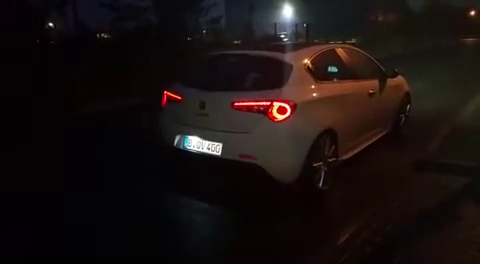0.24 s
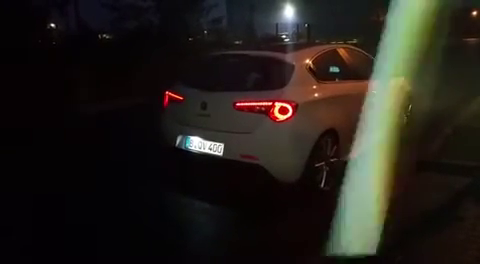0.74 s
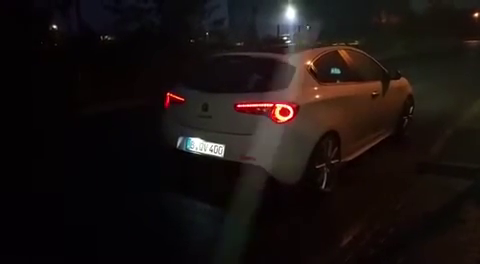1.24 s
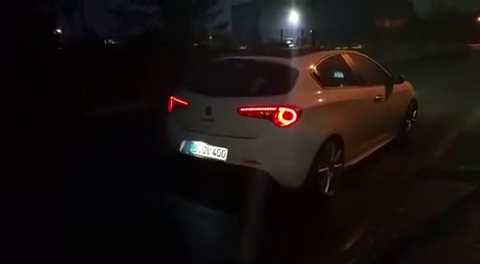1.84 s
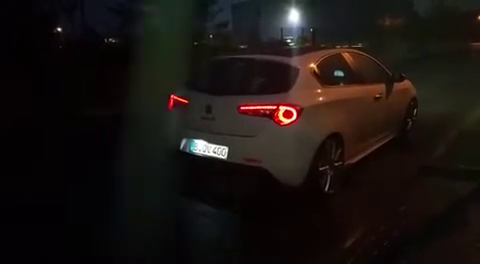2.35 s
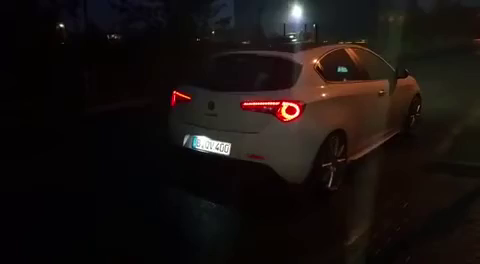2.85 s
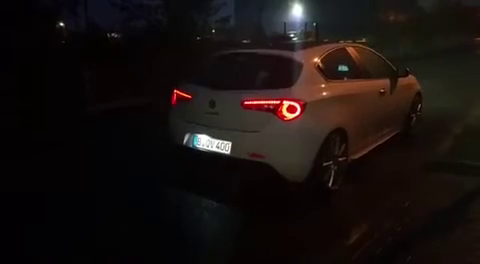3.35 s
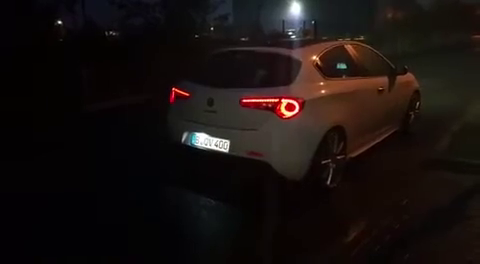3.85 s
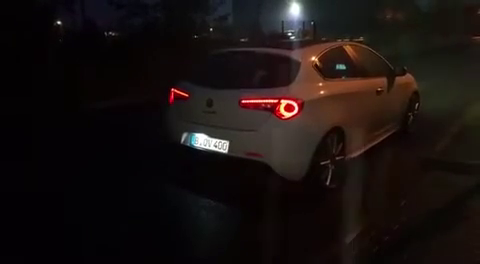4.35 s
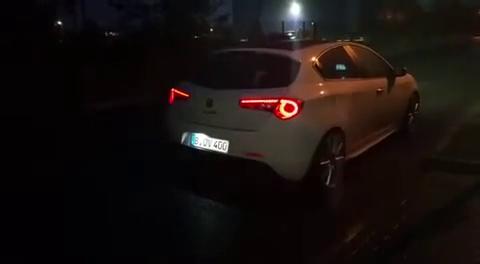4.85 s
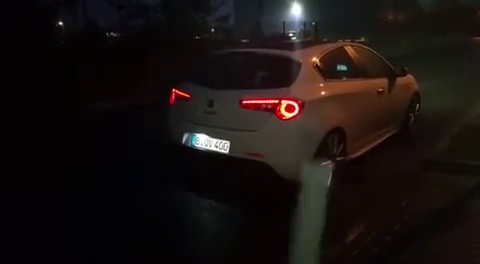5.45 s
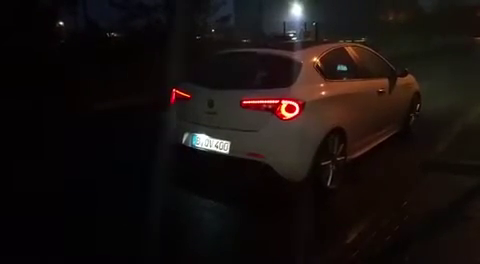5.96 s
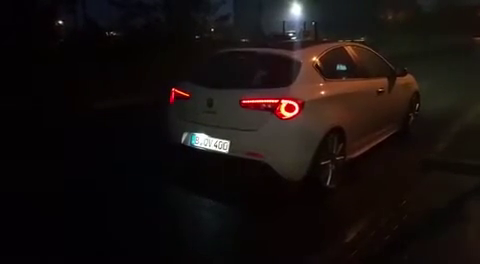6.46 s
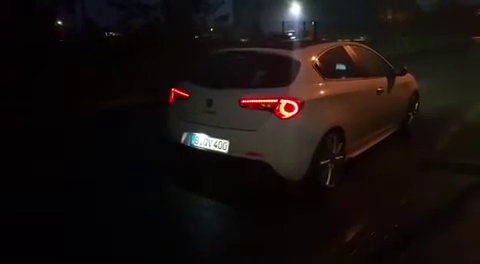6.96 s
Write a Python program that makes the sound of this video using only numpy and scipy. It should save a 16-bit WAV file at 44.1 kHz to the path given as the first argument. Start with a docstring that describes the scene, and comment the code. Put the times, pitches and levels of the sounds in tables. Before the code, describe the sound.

A turbocharged four-cylinder car stands on a street, heard from behind. At the start a rev is dying away with a low burble and small pops, reaching idle at about 1.5 seconds. At 1.8 seconds the engine revs up with a booming, rasping bark, peaking near 2.5 seconds. Sharp exhaust bangs and a brief hiss of air follow at 2.6, then crackles and smaller pops until about 3.6. The engine burbles down with soft low thumps and settles to idle around 5 seconds. A second rev rises at 5.6 seconds, holds briefly, and a third climbs higher from 6.3. The loudest bang comes at about 6.8 seconds, followed by a light blip of the throttle near 7. Faint engine clatter, ticking and turbo hiss run underneath, with a very faint falling whistle as the engine slows. Buildings give the bangs a short echo.

```python
"""Revving a turbo car

A turbocharged four-cylinder car stands on a wet street and is revved three times, heard from behind.
Each firing sends a pulse down the exhaust, which booms and rasps, louder at the pipe's own pitches.
As the revs fall, unburnt fuel burbles, pops and bangs, until the idle control feeds the engine again.
The fuel pump ticks, the turbo hisses and whistles as it runs down, and buildings echo the bangs."""
import sys
import numpy as np
from scipy import signal
from scipy.fft import rfft, irfft, next_fast_len
from scipy.io import wavfile
from scipy.ndimage import uniform_filter1d, map_coordinates

SR = 44100
rng = np.random.default_rng(int(sys.argv[2]) if len(sys.argv) > 2 else 0)


def to_wav(sig):
    """Store sig (one row per channel, or 1-D mono) as 16-bit WAV at the path in sys.argv[1].

    Samples outside -1..1 are clipped; the rate is SR.
    """
    pcm = np.clip(np.atleast_2d(sig), -1, 1) * 32767
    pcm = np.round(pcm).astype(np.int16)
    wavfile.write(sys.argv[1], SR, pcm.T)  # frames by channels


N = 317961

# how alike the noise is in both ears: (frequency [Hz], likeness [0-1])
EAR_LIKENESS = [(400,1),(800,0.99),(1400,0.12),(3000,0.22),(7000,0.23),(15000,0.1)]
# how much louder the left microphone is than the right: (frequency [Hz], gain [dB])
LEFT_LEAN = [(1000,0),(2010,1.5),(3330,3.5),(5500,-6.5),(9080,12),(12000,-7),(15000,-8)]
# how long the street echoes: (frequency [Hz], time to fade by 60 dB [s])
ECHO_FADE = [(150,0.32),(600,0.54),(3000,0.4),(8000,0.57),(15000,0.2)]
# the tone of each sound, as the pitches it favours: (frequency [Hz], relative gain [dB])
ECHO_TONE = [(150, -45.5), (500, -34.5), (1200, 3.5), (12000, 13.0)]  # echo off the buildings
CLATTER_TONE = [(100, 4.5), (260, 13.5), (370, 8), (540, 4.5), (680, 13.5), (800, 1), (1000, 6), (1450, -5),
                (1700, -1), (2000, 0), (2600, -7.5), (3100, -16.5), (3900, -12.5), (4800, -24),
                (7000, -28.5), (16000, -22)]  # moving engine parts
HISS_TONE = [(3000,-48),(7000,-22),(10000,-5.5),(12300,2),(13800,-1.5),(15500,6)]  # rushing air
TICK_TONE = [(2000,-24),(9000,-28.5),(12300,0),(13500,-4),(15500,6.5)]  # fuel pump
SILENCER_TONE = [(20,-46.5),(35,-1.5),(60,-2.5),(90,-1),(140,-4.5),(180,-10),(236,-11),(330,-22),(800,-102)]  # flutter in the silencer
HUM_TONE = [(250, -53.5), (385, -18), (425, 31.5), (470, -12), (800, -62.5)]  # one narrow resonance of the pipe
KNOCK_TONE = [(120,-35.5),(240,-16),(330,-0.5),(440,12),(550,-8.5),(650,9),(800,-31.5),(1130,-1.5),(1450,-32),(3000,-84)]  # hollow knock of the pipe
BANG_TONE = [(100,13.5),(240,-3.5),(350,7.5),(450,0),(560,-1.5),(660,5.5),(800,-1),(930,-2),(1150,5.5),(1450,-11.5),(1800,4),(2100,-29.5),(2350,-9),(3100,-18.5),(4100,-28.5),(9000,-59)]  # body of an explosion
CRACK_TONE = [(800, -122), (2000, 12), (3200, 3.5), (4200, 6), (6000, 4), (10000, -5), (13000, 1.5),
              (15500, -1)]  # its sharp edge
BARK_TONE = [(120,-39.5),(250,-2.5),(340,-10),(415,11.5),(450,10),(490,2),(560,-4.5),(640,2),(700,-7.5),(760,-4),(930,-15.5),(1150,-13.5),(1430,-46),(1700,-13.5),(2100,-67),(2500,-24.5),(3500,-57.5)]  # exhaust pipe, struck by the firings
RASP_TONE = [(900,-1),(1150,24),(1430,-6.5),(1720,19),(2100,7.5),(2550,9),(3200,-3),(4200,2.5),(5500,1),(7000,-5),(8000,-4),(10500,-19),(16000,-43)]  # swirling exhaust gas

# loudness of the engine's clatter: (time [s], level [dB])
CLATTER_LEVEL = [(0, -32.5), (.25, -43.5), (.75, -56), (1.22, -41.5), (2.75, -33.5), (2.9, -42.5),
                 (4.0, -47.5), (4.59, -39), (5.49, -44), (5.6, -37), (7.21, -40)]
# the turbo running down: (time [s], pitch [Hz], level [dB])
TURBO_WHISTLE = [(1.0,6160,-89),(1.17,6070,-70),(1.4,5900,-66),(1.7,5850,-93),(4.4,6200,-88),(4.57,6048,-64),(4.85,5860,-66),(5.2,5660,-85)]
# the dump valve lets the turbo's pressure go: (time [s], level [dB])
VALVE_DUMPS = [(2.635, -30), (6.85, -44)]
# single sharp, high ticks: (time [s], level [dB])
SNAPS = [(1.822, -32), (3.093, -22), (3.367, -36), (5.554, -26)]
# soft heaves of gas with no crack: (time [s], peak level [dB])
SOFT_HEAVES = [(0.49, -17.5), (0.883, -16.5), (0.991, -16.5), (2.412, -6), (2.555, -0.5), (3.664, -13),
               (3.82, -13.5), (3.899, -18.5), (4.136, -9), (4.257, -14), (4.375, -11.5), (4.409, -12),
               (4.769, -14), (5.545, -8), (6.148, -7), (6.185, -4.5), (6.636, -5)]
# fuel exploding in the pipe, in relative levels: (time [s], blast [dB], heave [dB], crack [dB])
EXPLOSIONS = [(0.073, -29, -15, -39.5), (0.165, -31, -15, -63), (0.205, -27.5, -35, -53),
              (0.266, -34.5, -16.5, -54), (0.302, -38, -18, -57), (0.343, -32.5, -16, -58),
              (2.588, -8.5, -6, -33), (2.626, -2, -14, -18), (2.667, -18, -14.5, -26.5),
              (2.744, -22.5, -15.5, -45), (2.858, -31, -15.5, -50), (2.98, -14, -16, -39.5),
              (3.034, -37, -35, -46.5), (3.093, -13, -13, -36), (3.123, -37, -24, -41.5),
              (3.21, -22.5, -18, -39), (3.261, -25.5, -34, -46), (3.368, -25.5, -15, -41),
              (3.398, -26.5, -20, -43), (3.476, -22, -11.5, -51), (3.508, -29.5, -12, -46),
              (3.57, -25.5, -21, -53), (3.597, -30.5, -14.5, -56), (4.191, -38, -35, -65),
              (6.841, 7.5, -2, -14), (6.876, -14, -22, -38.5)]

# engine speed: (time [s], firing rate [Hz])
ENGINE_SPEED = [(0, 90.5), (.3, 84), (.94, 59), (1.51, 47), (1.76, 44.2), (1.85, 47.3), (2.09, 82),
                (2.38, 132), (2.55, 139.5), (2.85, 114.4), (3.35, 95), (3.57, 83), (4.16, 63.2),
                (4.82, 48.6), (5.56, 38.2), (5.68, 49.2), (5.88, 78.5), (6.0, 85), (6.3, 83.4),
                (6.615, 134.5), (6.83, 135.5), (7.0, 131), (7.12, 136), (7.21, 125)]
# spells when the engine gets fuel, in relative levels; between them it coasts. In order: a dying rev,
# idle, rev one, late firing, sputter, idle, rev two, rev three, late firing, a light touch of the pedal.
# (start [s], end [s], rise [s], fall [s], load [dB], bark [dB], bark swell [dB/s],
# tilt [dB per harmonic], rasp [dB], air hiss [dB], uneven burning [0-1])
FUEL_SPELLS = [(0, 0.156, 0.0058, 0.27, -16.5, -12.5, -22, -7.5, -23, -67, 0.57),
               (0.983, 1.788, 0.29, 0.015, -13.5, -17, -49, 2, -26, -45.5, 0.2),
               (1.777, 2.394, 0.076, 0.06, -0.3, 0, -2.5, 0.07, 1, -39.5, 0.18),
               (2.419, 2.549, 0.01, 0.014, -4.5, -10, -2, 2, -6, -37, 0.54),
               (3.08, 4.265, .1, 0.11, -26, -18, 17, -4.5, -37, -69, 0.77),
               (4.208, 5.595, 0.3, 0.01, -12.5, -18, -26, 0.25, -23.5, -44.5, 0.14),
               (5.57, 5.984, 0.079, 0.29, -1, -0.5, 25, 0.45, 1.5, -37.5, 0.18),
               (6.269, 6.626, .07, 0.044, -0.6, -0.5, -12, -2.2, -.5, -38, 0.17),
               (6.66, 6.811, 0.01, 0.024, -5.5, -10, 4, 0, -7.5, -35.5, 0.44),
               (6.95, 7.113, 0.038, 0.0082, -11.5, -12, -8, 2, -14, -58, 0.19)]
# the four cylinders in turn: (relative strength [dB])
CYLINDER_DB = [-0.79,-2.4,1,1]
# the pipe barks most at speeds that hit its resonances: (firing rate [Hz], gain [dB])
BARK_BY_SPEED = [(37, -62), (43, -58), (50, -26), (68, -31.5), (80, -19), (92, -22.5), (105, -22),
                 (115, -19), (135, -15)]
# the harmonics, tones at one to five times the firing rate: (relative level [dB])
HARMONIC_DB = [2.5, -2.5, -7, -10.5, -19.5]
# how well the exhaust lets those tones through: (frequency [Hz], gain [dB])
BOOM_TONE = [(35, -17.5), (50, -8), (62, -7), (105, -8.5), (124, -14), (135, -11.5), (158, -7),
             (182, -16.5), (205, -17), (250, -11), (272, -23.5), (315, -14.5), (355, -29), (400, -17.5),
             (470, -5), (520, -17), (620, -28), (760, -45)]

COAST_LOAD_DB, COAST_BARK_DB, COAST_RASP_DB, COAST_HISS_DB = -24.5, -43, -73, -76  # left with no fuel
COAST_UNEVEN, COAST_TILT_DB = 0.79, -4  # with no fuel the engine is rougher and duller


def amp(db):
    """Turn decibels into a gain to multiply by."""
    return 10 ** (np.asarray(db) / 20)


def unit(x):
    """Scale a sound so that its average (rms) level is 1."""
    return x / np.sqrt(np.mean(x ** 2) + 1e-20)


def steady(x, size=3500):
    """Even out a sound so that its level stays near 1."""
    power = uniform_filter1d(uniform_filter1d(x * x, size), size)
    return x / np.sqrt(np.abs(power) + 1e-4 * np.mean(x * x))


def look_up(table, hz):
    """Read between the rows of a (frequency, value) table, with octaves evenly spaced."""
    table_hz, values = np.transpose(table)
    return np.interp(np.log(hz + 1), np.log(table_hz + 1), values)


def curves(table):
    """Join a timed table's rows with straight lines: one curve per column after the time."""
    times, *columns = np.transpose(table)
    return [np.interp(np.arange(N) / SR, times, column) for column in columns]


def wobble(rate):
    """A smooth curve through `rate` random values a second."""
    points = rng.standard_normal(int(N * rate / SR) + 4)
    return map_coordinates(points, [np.arange(N) * rate / SR])


def filtered(x, response):
    """Multiply each frequency in a sound by response(hz)."""
    size = next_fast_len(N + SR // 2)
    return irfft(rfft(x, size) * response(np.fft.rfftfreq(size, 1 / SR)), size)[..., :N]


def ring(x, tone, size=8192):
    """Let a sound ring through something with the given tone."""
    cepstrum = irfft(np.log(amp(look_up(tone, np.fft.rfftfreq(size, 1 / SR)))))
    # fold it so that the ringing comes after each hit, never before
    cepstrum[1:size // 2] *= 2
    cepstrum[size // 2 + 1:] = 0
    ringing = irfft(np.exp(rfft(cepstrum)))
    return filtered(x, lambda hz: rfft(ringing / np.linalg.norm(ringing), next_fast_len(N + SR // 2)))


def noise():
    """White stereo noise, alike in both ears in the bass and less so in the treble."""
    def shares(hz):
        angle = np.arccos(np.clip(look_up(EAR_LIKENESS, hz), 0, 1)) / 2
        return np.array([np.cos(angle), np.sin(angle)])
    mid, side = filtered(rng.standard_normal((2, N)), shares)
    return np.array([mid + side, mid - side])


def pulses(positions, sizes):
    """Clicks that can fall between two samples."""
    index = np.floor(positions).astype(int)[:, None] + np.arange(-7, 9)
    lag = index - positions[:, None]
    shape = np.sinc(lag) * np.cos(np.pi * lag / 16) ** 2
    return np.bincount(np.clip(index, 0, N).ravel(), (shape * sizes[:, None]).ravel(), N + 1)[:N]


def gate(cycles, sharpness, base):
    """A gain that jumps up at the start of each cycle, then sinks towards a base level."""
    return unit(base + np.exp(-sharpness * (cycles % 1)))


def bursts(rows, fade_s):
    """A gain that jumps up at each (time, level) row and drops 60 dB in fade_s."""
    t = np.arange(N) / SR
    return sum((t > start) * amp(db - 60 * np.abs(t - start) / fade_s) for start, db in rows)


def street_echo(x):
    """Buildings send back a blurred echo, thin in the bass and different at each ear."""
    hz, t, spectrum = signal.stft(rng.standard_normal((2, SR)), SR, nperseg=256)
    fade = amp(-60 * t / look_up(ECHO_FADE, hz)[:, None])
    tail = signal.istft(spectrum * fade, SR, nperseg=256)[1]
    delayed = np.pad(x, ((0, 0), (400, 0)))
    echo = signal.fftconvolve(delayed, tail / np.linalg.norm(tail[0]), axes=1)[:, :N]
    return filtered(echo, lambda hz: amp(look_up(ECHO_TONE, hz)))


def clatter(firings):
    """The engine's moving parts rattle, pulsing slightly with each firing."""
    rattle = noise() * gate(firings, sharpness=1.0, base=5.8)
    return amp(curves(CLATTER_LEVEL)[0]) * unit(ring(rattle, CLATTER_TONE))


def airflow(demand, lag_s=0.084):
    """How hard the air rushes: the turbo lags behind the pedal, and the dump valve adds gushes."""
    keep = np.exp(-1 / (lag_s * SR))
    flow = signal.lfilter([1 - keep], [1, -keep], demand)
    return np.hypot(flow + bursts(VALVE_DUMPS, fade_s=0.35), amp(COAST_HISS_DB))


def air_hiss(air):
    """Air hisses as it rushes through the turbo."""
    return air * unit(ring(noise(), HISS_TONE))


def fuel_pump(firings, air):
    """The pump ticks once per engine turn (two firings), louder when more air flows."""
    strokes = noise() * gate(firings / 2, sharpness=8, base=0.01) * amp(3.5 * wobble(25))
    return amp(-23.5) * np.sqrt(air) * unit(ring(strokes, TICK_TONE))


def turbo_whistle():
    """The slowing turbo gives a falling whistle; a fast wobble in pitch makes it airy."""
    hz, db = curves(TURBO_WHISTLE)
    return amp(db) * np.sin(2 * np.pi * np.cumsum(hz + 215 * wobble(1000)) / SR)


def snaps():
    """Single sharp ticks, as bright as the fuel pump's."""
    return ring(bursts(SNAPS, fade_s=0.035) * noise(), TICK_TONE)


def burble(firings):
    """Late, partial burns flutter in the silencer and hum in the pipe."""
    lumps = amp(3.5 * wobble(30))
    puffs = noise()[0] * gate(firings, sharpness=3.1, base=0.047) * lumps
    return amp(-10.5) * steady(ring(puffs, SILENCER_TONE)) + amp(-27.5) * steady(ring(puffs, HUM_TONE))


def heaves(rows, typical_hz=76, rise_s=0.0052):
    """Each (time, level) row pushes one low wave of gas out of the pipe."""
    t = np.arange(SR // 12) / SR
    swell = t / rise_s * np.exp(1 - t / rise_s)
    sound = np.zeros(N + SR)
    for time, db in rows:
        hz = typical_hz * np.exp(0.068 * rng.standard_normal())
        sound[round(time * SR):][:len(t)] -= amp(db) * swell * np.sin(2 * np.pi * hz * t)
    return sound[:N]


def afterfire(blast_fade_s=0.064, crack_fade_s=0.033):
    """Unburnt fuel explodes in the pipe: a low heave, a hollow knock, a bang and a sharp crack."""
    t = np.arange(SR // 6) / SR
    shocks, knocks, blasts, cracks = np.zeros((4, N + SR))
    for time, blast_db, _, crack_db in EXPLOSIONS:
        start, size = round(time * SR), amp(blast_db - 5)
        shocks[start] += 13 * size
        knocks[start] += 7 * size ** 0.55  # small charges mostly just knock the pipe
        roar_s = blast_fade_s * size ** 0.033  # bigger ones roar for longer
        blasts[start:][:len(t)] += size * amp(-60 * t / roar_s)
        cracks[start:][:len(t)] += amp(crack_db + 7 - 60 * t / crack_fade_s)
    low = heaves([(time, heave_db + 0.5) for time, _, heave_db, _ in EXPLOSIONS])
    bang = ring(shocks[:N] + blasts[:N] * noise(), BANG_TONE)
    return low + ring(knocks[:N], KNOCK_TONE) + bang + ring(cracks[:N] * noise(), CRACK_TONE)


def fuel_supply():
    """Each spell of fuel rises, holds and dies away, setting how loud and rough the engine is."""
    t = np.arange(N) / SR
    columns = np.transpose(FUEL_SPELLS)[:, :, None]
    start, end, rise, fall, load_db, bark_db, swell, tilt_db, rasp_db, air_db, rough = columns
    fuel = np.clip((t - start) / rise, 0, 1) * np.exp(-np.clip((t - end) / fall, 0, 20))
    edge = fuel ** 2.35  # bark and rasp come later and go sooner than the boom
    swell_db = swell * (np.clip(t, start, end) - (start + end) / 2)
    coasting = np.clip(1 - fuel.sum(0), 0, 1)
    uneven = np.clip((rough * fuel).max(0) + COAST_UNEVEN * coasting, 0, 1)
    tilt = ((tilt_db + 0.3 * swell_db) * fuel).sum(0) + COAST_TILT_DB * coasting  # higher is brighter
    load = np.hypot((amp(load_db) * fuel).max(0), amp(COAST_LOAD_DB))  # how hard the engine works
    bark = (amp(bark_db + swell_db) * edge).max(0)
    rasp = (amp(rasp_db + 0.31 * swell_db) * edge).max(0)
    air = (amp(air_db) * fuel).max(0)
    return load, bark, rasp, air, tilt, uneven


def exhaust_rasp(firings, octaves, drive):
    """Each firing drives out a puff of swirling gas, 9 dB louder when the speed doubles."""
    puffs = noise() * gate(firings, sharpness=4, base=0.17) * amp(1.8 * wobble(90))
    gain = np.hypot(drive * amp(-31), amp(COAST_RASP_DB)) * amp(9 * octaves)
    return gain * unit(ring(puffs, RASP_TONE))


def exhaust_bark(firings, firing_hz, drive, uneven):
    """Each firing rings the pipe; uneven burning scatters the pulses in strength and timing."""
    numbers = np.arange(1, int(firings[-1]))
    size_luck, time_luck = rng.standard_normal((len(numbers), 2)).T
    positions = np.interp(numbers, firings, np.arange(N))
    rough = uneven[positions.astype(int)]
    scatter_db = 0.9 + 4 * rough
    jitter_s = 0.00011 + 0.0006 * rough ** 2
    sizes = amp(np.take(CYLINDER_DB, numbers, mode="wrap") + scatter_db * size_luck)
    beats = steady(pulses(positions + SR * jitter_s * time_luck, sizes))
    swirl = (0.3 + 0.4 * uneven) * noise() * gate(firings, sharpness=0.33, base=0.36)
    fuelled = drive * amp(look_up(BARK_BY_SPEED, firing_hz))
    coasting = amp(COAST_BARK_DB) * uneven / COAST_UNEVEN
    return np.hypot(fuelled, coasting) * steady(ring(beats + swirl, BARK_TONE))


def exhaust_boom(firings, firing_hz, tilt_db, uneven, smooth_above_hz=70):
    """Low firing tones sweep through the silencer's resonances and stagger when burning is uneven."""
    stagger = 0.082 * uneven * wobble(35)
    lumpy_db = 8 * np.clip(1 - firing_hz / smooth_above_hz, 0, 1)  # a slower engine wavers more
    tones = 0
    for k, db in enumerate(HARMONIC_DB, 1):
        flutter_db = 0.7 * np.sqrt(k) * wobble(45)  # no two firings burn quite alike
        tone_db = db + (k - 1.5) * tilt_db + look_up(BOOM_TONE, k * firing_hz)
        gain = amp(tone_db + flutter_db + lumpy_db * wobble(12))
        tones += gain * np.sin(2 * np.pi * k * (firings + stagger) + np.pi / 6)
    return amp(2.36 * uneven * wobble(35)) * tones


def scene():
    """Mix the car and its echo; one running count of firings keeps the engine's sounds in step."""
    firing_hz, = curves(ENGINE_SPEED)
    firings = np.cumsum(firing_hz) / SR
    octaves = np.log2(firing_hz / 100)  # doublings of speed from 100 firings a second
    load, bark_drive, rasp_drive, air_demand, tilt_db, uneven = fuel_supply()
    boom = load * exhaust_boom(firings, firing_hz, tilt_db, uneven)
    bark = exhaust_bark(firings, firing_hz, bark_drive, uneven)
    rasp = exhaust_rasp(firings, octaves, rasp_drive)
    exhaust = boom + bark + rasp + uneven * load ** 0.74 * burble(firings) + heaves(SOFT_HEAVES)
    pops = afterfire()
    air = airflow(air_demand * amp(4 * octaves))
    engine_bay = clatter(firings) + air_hiss(air) + fuel_pump(firings, air) + turbo_whistle()
    echo = street_echo(amp(-15) * exhaust + amp(-22) * pops)
    return echo + engine_bay + snaps() + pops + exhaust


def record(dry, ceiling=0.97, top_hz=16000):
    """Two microphones, each with its own tone, overload on the bangs and lose the highest treble."""
    x = filtered(dry, lambda hz: amp(np.outer([0.5, -0.5], look_up(LEFT_LEAN, hz))))
    x = x / (1 + np.abs(x / ceiling) ** 6) ** (1 / 6)  # round off the loudest peaks
    return filtered(x, lambda hz: hz < top_hz)


dry = scene()
out = record(dry)
to_wav(out)
```